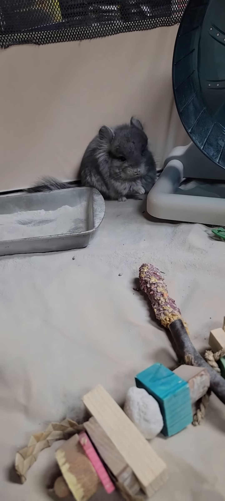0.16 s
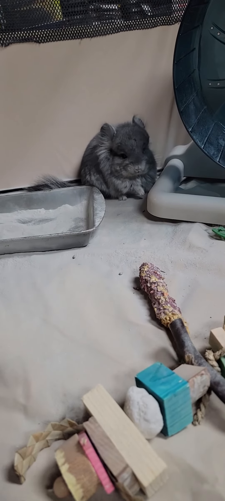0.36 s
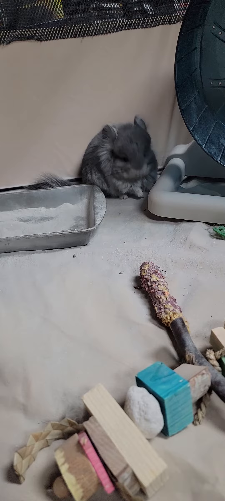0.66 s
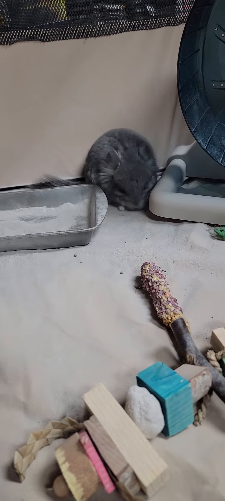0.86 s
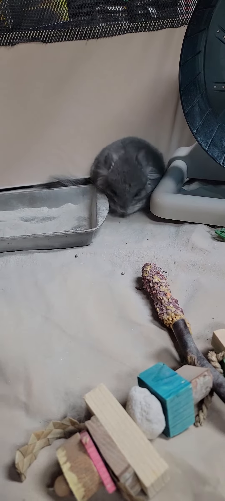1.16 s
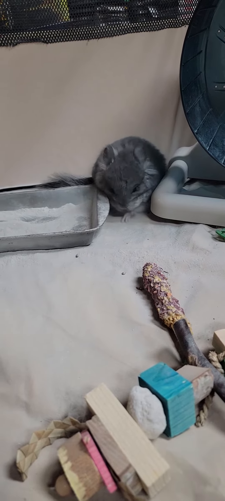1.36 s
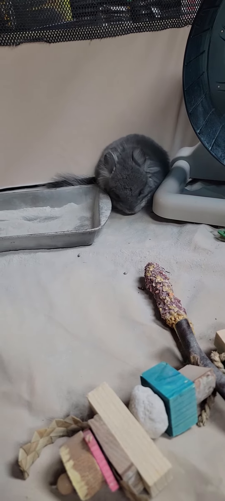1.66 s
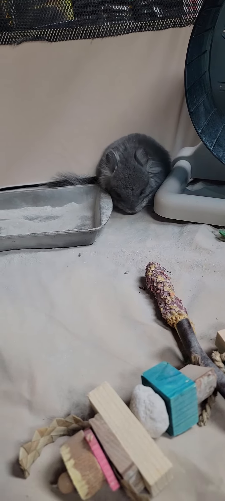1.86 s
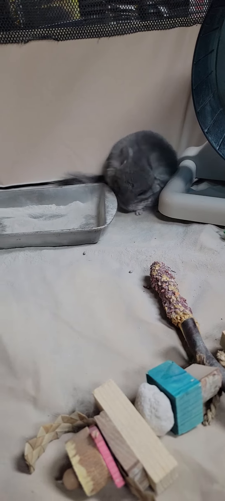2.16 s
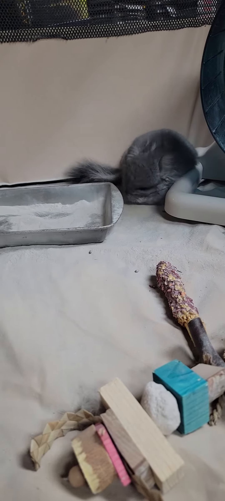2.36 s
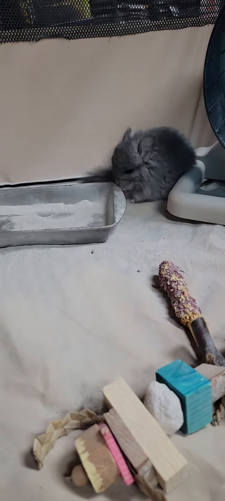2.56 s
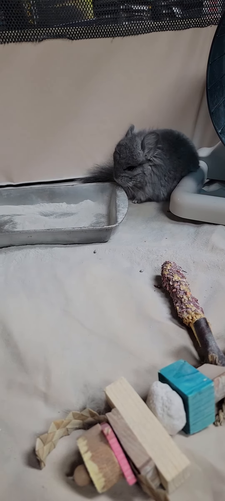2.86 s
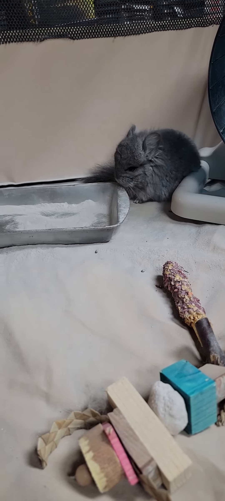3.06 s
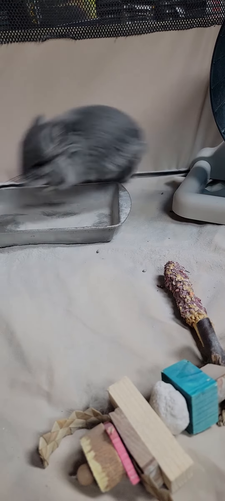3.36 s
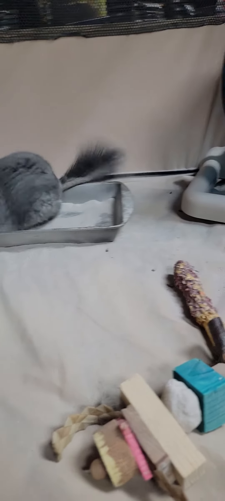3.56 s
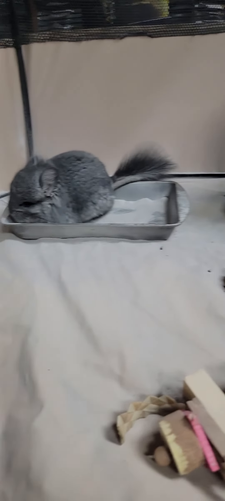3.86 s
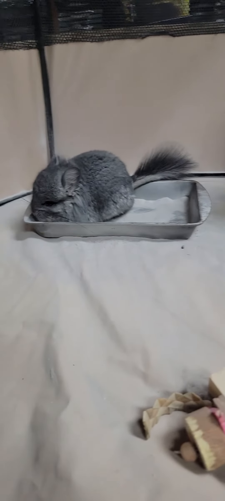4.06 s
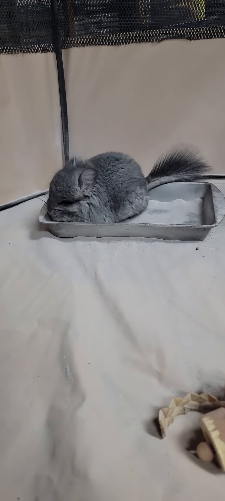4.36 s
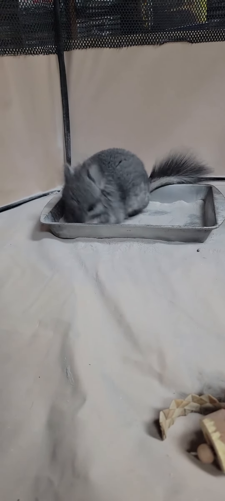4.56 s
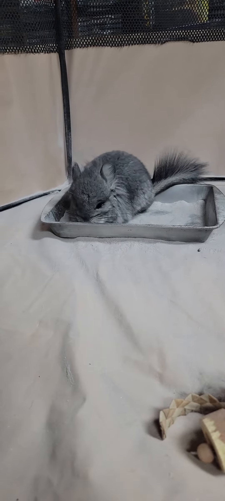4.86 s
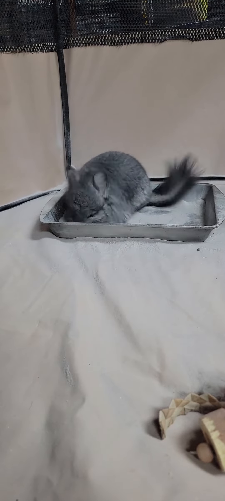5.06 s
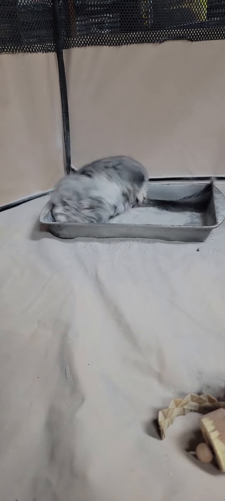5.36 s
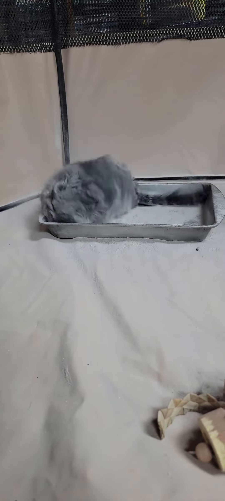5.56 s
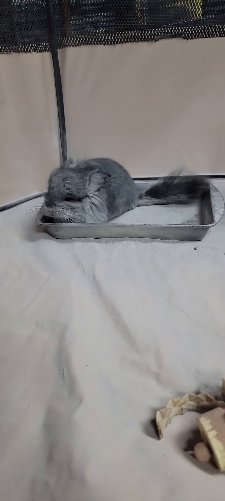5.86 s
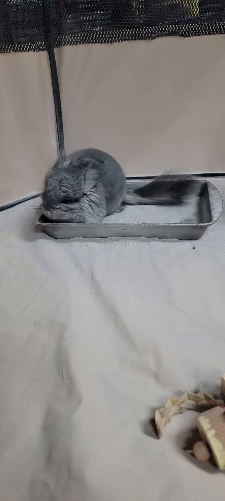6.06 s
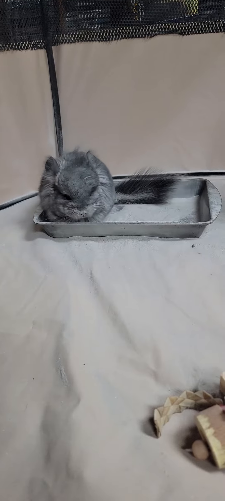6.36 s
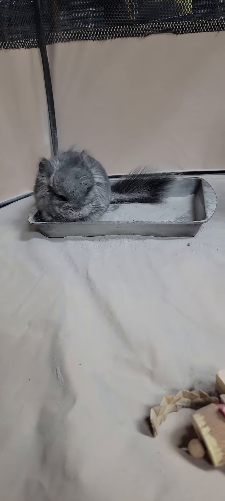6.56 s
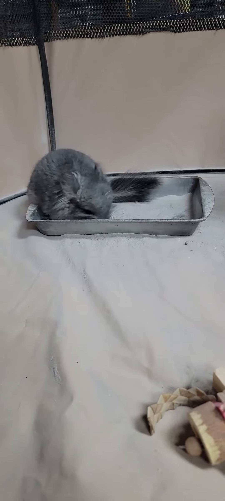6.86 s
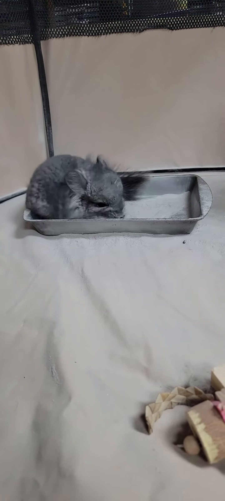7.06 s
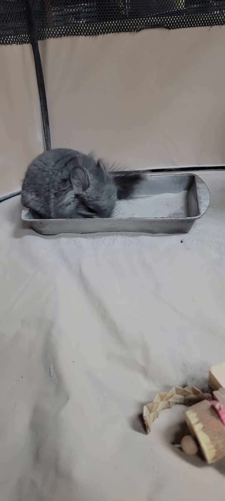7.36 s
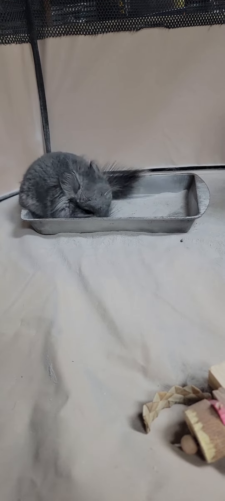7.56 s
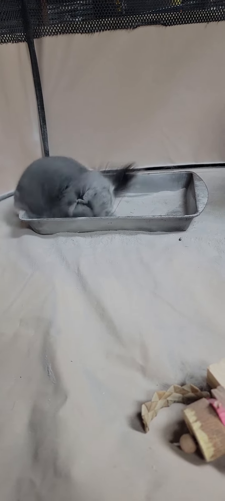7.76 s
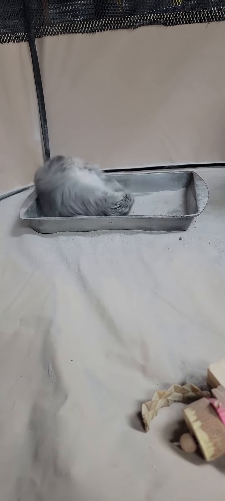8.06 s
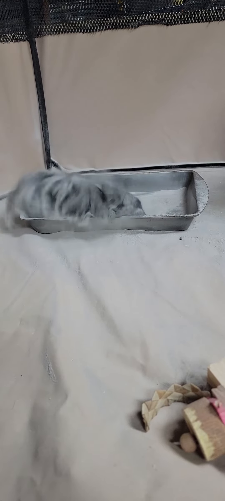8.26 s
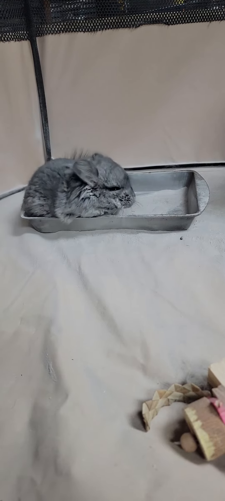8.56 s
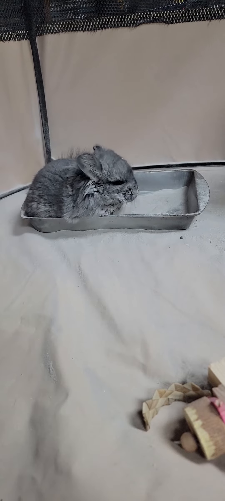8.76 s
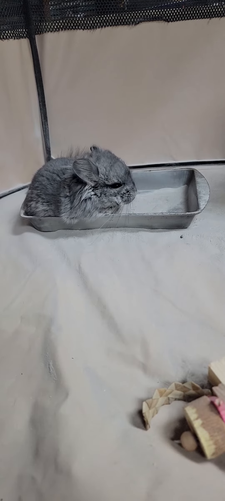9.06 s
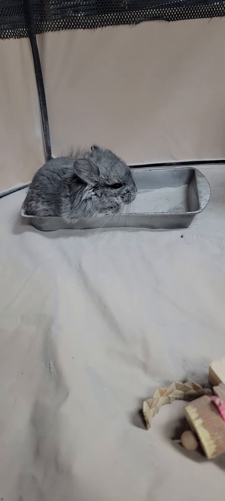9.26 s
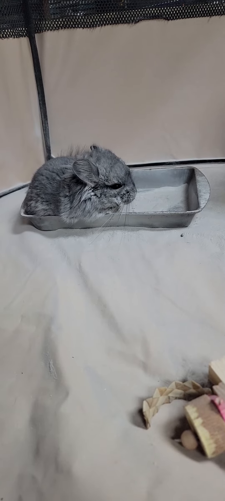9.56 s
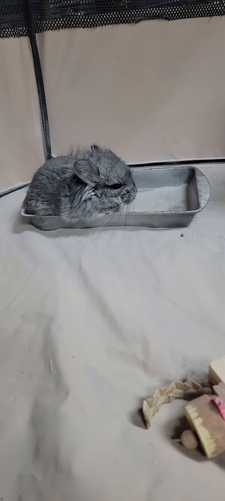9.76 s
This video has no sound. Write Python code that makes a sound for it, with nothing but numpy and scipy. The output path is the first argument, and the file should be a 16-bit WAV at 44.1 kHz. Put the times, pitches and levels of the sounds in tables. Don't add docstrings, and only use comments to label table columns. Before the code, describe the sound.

Close stereo phone pickup in a quiet room with faint low rumble. A chinchilla scratches cloth and plastic in two fast, squeaky bouts with soft floor thuds. It hops into a tin tray with a clank and dusty skid, pauses, then digs and rolls: short damped metallic knocks and hissing grains. A last hard bump is followed by near quiet, tiny grunts and one light ringing tap.

```python
import sys
import numpy as np
from scipy import signal
from scipy.fft import rfft, irfft
from scipy.io import wavfile
from scipy.ndimage import uniform_filter1d

SR = 44100
rng = np.random.default_rng(int(sys.argv[2]) if len(sys.argv) > 2 else 0)


def elevation(decibels):
    levels = np.asarray(decibels, float)
    return 10 ** (levels / 20)


def generate_wav(signal):
    frames = np.transpose(np.atleast_2d(signal))
    scaled = np.clip(frames, -1, 1) * 32767
    pcm = np.round(scaled).astype(np.int16)
    wavfile.write(sys.argv[1], SR, pcm)


N = 437472
HZ = np.fft.rfftfreq(N, 1 / SR)

# (frequency [Hz], level [dB per Hz])
ROOM_SPECTRUM = [(20, -3.5), (30, -2), (40, -3.5), (65, 2.5), (125, -8.5), (150, -16.5), (330, -23),
                 (390, -38), (520, -33.5), (850, -37), (1500, -29.5), (2200, -39.5), (6900, -49.5),
                 (8400, -60.5), (11500, -58.5), (12400, -53.5), (15500, -49)]
# (start [s], swell [s], hold [s], level [dB],
# drift [dB])
CLOTH_MOVES = [
    (0, 0.0085, 7.4, -83.5, -5),
    (0, 0.037, 0.19, -77, -3),
    (.33, 0.066, 0.035, -76.5, 0),
    (.78, 0.13, 0.193, -70, -11),
    (2.235, 0.034, 0.013, -53.5, -5),
    (2.3, .03, .2, -66, 1),
    (2.7, 0.041, 0.29, -73.5, -16),
    (2.6, 0.024, 0.011, -58, -3),
    (3.13, 0.064, 0.091, -66.5, -9),
    (4.09, 0.068, 0.11, -60, -3),
]
# (time [s], peak level [dB], centre [Hz])
DUST_TICKS = [(0.038, -70.5, 3300), (0.189, -71.5, 6300), (0.301, -80, 5500), (.34, -69.5, 5000),
              (0.384, -78, 6400), (1.984, -72.5, 4700), (2.576, -63, 5500), (2.682, -64, 5240),
              (2.727, -63, 5100), (2.808, -99, 5610), (4.515, -73.5, 6000), (4.673, -70.5, 5000),
              (9.067, -74, 6200)]
# (peak time [s], level [dB], floor pitch [Hz], heel level [dB])
FOOTFALLS = [(.254, -47, 32.5, -58), (0.756, -29, 47.9, -31.5), (0.887, -44, 38.1, -51.5),
             (1.32, -30.5, 50, -45), (1.495, -50, 37.1, -50.5), (1.86, -44, 42.7, -69),
             (1.92, -37, 41.65, -47), (2.03, -45.5, 39, -50), (2.498, -27, 50.55, -42),
             (2.628, -43, 53.3, -43), (3.023, -47.5, 57.6, -62), (3.115, -44, 52.4, -53),
             (3.608, -42.5, 40.7, -52.5), (6.549, -50.5, 50.5, -63.5), (7.055, -41.5, 38, -55),
             (7.13, -53, 36.7, -70), (7.631, -43, 36, -65.5)]
# (frequency [Hz], level [dB], t60 [s])
TRAY_MODES = [(209, 2, 0.14), (327, 0.5, 0.15), (525, 1, 0.055), (714.5, -6.5, 0.067), (788, -0.5, 0.043),
              (948, -3.5, 0.06), (1210, -6.5, 0.1), (1373, -1, 0.026), (1798, -4, 0.061),
              (2290, -4.5, 0.029), (2594, -10, 0.16), (3036, -8.5, 0.1), (3480, -6.5, 0.031)]
# (time [s], low ring [dB], high ring [dB], centre of high ring [Hz], centre of low ring [Hz])
FIRST_KNOCKS = [(0.411, -51, -67.5, 1140, 700), (3.345, -74, -42, 2590, 900),
                (3.456, -27, -43.5, 1140, 910), (3.478, -31, -59, 1730, 616), (3.52, -60, -42, 2650, 800),
                (4.613, -51.5, -56.5, 1670, 800), (4.998, -58, -59, 2280, 800),
                (5.237, -60, -62, 1710, 800), (5.565, -35, -52.5, 1780, 800),
                (5.604, -35.5, -60, 1120, 637), (5.704, -64, -47, 1390, 800),
                (5.706, -62, -49.5, 3020, 800), (5.722, -38.5, -54, 1480, 780),
                (5.769, -28, -44.5, 1200, 736), (5.972, -32, -52.5, 1260, 705),
                (6.145, -44.5, -57, 1460, 795), (6.612, -52.5, -70, 1160, 780),
                (6.783, -50, -64, 1144, 804)]
# (time [s], low ring [dB], high ring [dB], centre of high ring [Hz], centre of low ring [Hz])
LATER_KNOCKS = [(7.035, -37.5, -57, 1800, 540), (7.063, -41, -48, 1290, 775), (7.063, -62, -46, 3000, 780),
                (7.116, -45, -60, 1120, 790), (7.154, -37.5, -43.5, 1800, 790),
                (7.155, -64, -52, 3400, 790), (7.202, -30, -55.5, 1400, 790),
                (7.243, -39.5, -58, 1400, 785), (7.275, -38, -58, 1570, 785),
                (7.296, -35, -53.5, 1140, 780), (7.351, -26.5, -48, 1840, 774),
                (7.426, -41, -53.5, 1660, 775), (7.448, -40, -64, 1070, 766),
                (7.533, -54.5, -68.5, 1532, 785), (7.651, -40, -59, 2290, 790),
                (7.674, -35, -56.5, 1243, 800), (7.738, -45.5, -57.5, 2700, 785),
                (8.221, -49, -63, 1210, 520), (8.282, -47, -61, 1790, 850), (8.41, -43, -38.5, 1400, 570),
                (8.447, -24.5, -37, 1310, 804), (8.463, -29.5, -49.5, 1110, 830)]
# (time [s], low ring [dB], high ring [dB], centre of high ring [Hz], centre of low ring [Hz])
PAW_PATS = [(5.005, -50.5, -67, 2300, 540), (5.044, -62, -59.5, 2300, 785), (5.08, -54, -67, 1800, 785),
            (5.1, -51, -60, 1200, 930), (5.125, -56, -56, 1800, 700), (5.146, -53, -55.5, 1300, 930),
            (5.19, -57, -64, 1300, 785), (5.38, -52, -78, 1300, 785), (5.485, -58, -61, 2540, 560),
            (7.711, -54, -61, 2300, 785), (7.945, -70, -77, 1800, 760), (8.3, -52, -57, 1800, 860)]
# (level after a -40 dB ring [dB], growth [dB per dB])
BOOM_LAW = (-62, 0.54)
PUFF_LAW = (-44, 1)
RUB_LAW = (-69, .7)
# (time [s], boom level [dB], pitch [Hz], t60 [s])
LANDINGS = [(.412, -62.5, 323, 0.15), (3.459, -54, 275, 0.046), (3.476, -47, 310, 0.048),
            (4.169, -55, 296, 0.044), (4.613, -56, 256, 0.076), (5.566, -47, 210, 0.039),
            (5.606, -61, 330, 0.066), (5.722, -49.5, 304, 0.037), (5.775, -56, 232, 0.041),
            (5.8, -67.5, 333, 0.32), (5.977, -49, 332, 0.093), (6.011, -55, 312, .06),
            (7.035, -56, 298, 0.049), (7.067, -49, 280, 0.048), (7.08, -56.5, 331, 0.16),
            (7.297, -44.5, 305, 0.024), (7.354, -50, 314, 0.036), (7.43, -54.5, 207, 0.066),
            (8.224, -68, 180, 0.047), (8.281, -64.5, 317, 0.21), (8.416, -54, 284, 0.079),
            (8.45, -39, 272, 0.028), (8.47, -63.5, 332, 0.18)]
# (start [s], swell [s], hold [s], level [dB], drift [dB])
TIN_SLIDES = [
    (5.66, .02, 0.11, -68, 6),
    (4.99, .02, 0.16, -76.5, 10),
    (6.99, 0.024, 0.092, -58.5, -2),
    (7.12, 0.017, 0.1, -55, -9),
    (7.68, 0.016, 0.11, -58, -6.5),
    (9.84, 0.026, .05, -67, 1.5),
]
# (start
# [s], swell [s], hold [s], level [dB], drift [dB])
DUST_MOVES = [(.715, 0.017, 0.0076, -62, 0.5), (3.15, 0.032, 0.12, -77, 5.5),
              (4.54, 0.025, 0.06, -69.5, 11.5), (4.985, 0.027, 0.047, -58, -0.5),
              (5.06, 0.019, 0.073, -54, 0), (5.215, 0.025, 0.012, -59, -4), (5.24, 0.026, .09, -66, 2.5),
              (5.32, .03, 0.018, -63, -5), (5.36, 0.023, 0.085, -70.5, -.6), (5.44, 0.036, 0.13, -62, -2),
              (5.6, 0.023, .04, -70, -2.5), (5.655, 0.026, 0.096, -54, -11.5),
              (5.78, .021, .06, -73.5, -10), (5.96, 0.028, 0.34, -73, -6),
              (6.58, 0.028, .03, -79, -.6), (6.67, 0.016, 0.12, -75, 0.5), (6.82, 0.025, 0.064, -75, -6),
              (6.92, 0.025, 0.054, -67, -4), (6.985, 0.047, 0.35, -58.5, -4.5),
              (7.25, 0.015, 0.021, -65, -.6), (7.41, .021, 0.057, -73.5, -5), (7.5, .03, 0.078, -81, -3),
              (7.58, .03, .04, -69.5, -4), (7.63, 0.026, 0.056, -66.5, -1.5),
              (7.68, 0.024, 0.019, -58, -1.5), (7.73, 0.032, 0.028, -62, 0.5),
              (7.79, .021, 0.12, -71, -2.5), (7.91, 0.034, 0.12, -69, -3.5), (8.02, 0.057, .05, -65.5, 1),
              (8.13, 0.024, 0.088, -74.5, 3.5), (8.239, 0.038, 0.0072, -56.5, 5),
              (8.3, .021, 0.1, -76, 7.5), (8.395, .011, .04, -70, -3), (8.51, 0.017, 0.16, -76, -7),
              (9.74, 0.1, 0.1, -76, -4)]
# (frequency [Hz], level [dB per Hz])
DUST_COLOUR = [(300, -45), (530, -7), (900, -4.5), (1500, -2.5), (2100, -3.5), (2900, -4), (3800, -8.5),
               (4600, -6), (8000, -10), (10300, -14), (13500, -3.5), (16000, -3)]
# (time [s], peak level [dB], squeak
# [Hz])
CLAW_STROKES = [(0.7275, -61, 1900), (0.742, -41, 2040), (0.858, -41.5, 2260), (0.896, -36.5, 2090),
                (0.947, -35.5, 2900), (0.9883, -43, 2130), (1.027, -23.5, 2040), (1.043, -30.5, 3200),
                (1.073, -30, 2180), (1.104, -53, 2260), (1.127, -20.5, 3740), (1.1686, -30.5, 2200),
                (1.21, -19.5, 3230), (1.228, -25.5, 2900), (1.2694, -38, 1690), (1.288, -30.5, 3000),
                (1.302, -17.5, 2286), (1.3306, -24.5, 2300), (1.361, -21, 2300), (1.377, -21, 3030),
                (1.389, -22.5, 3180), (1.4088, -25, 3400), (1.453, -20, 2914), (1.474, -34.5, 2000),
                (1.489, -28, 2900), (1.5, -45.5, 3700), (1.525, -52.5, 2900),
                (2.092, -51, 2490), (2.1341, -36.5, 2240), (2.175, -22, 2860), (2.191, -22, 2380),
                 (2.246, -40, 2200), (2.272, -26, 2300), (2.292, -24, 2400), (2.313, -33.5, 1830),
                 (2.369, -28.5, 2430), (2.418, -36.5, 1870), (2.472, -35, 1920), (2.532, -45.5, 1930),
                 (2.574, -47, 2380), (2.621, -42, 2150)]
# (start [s], swell [s], hold [s], level [dB], drift [dB])
CLAW_DRAGS = [
    (.8, 0.19, 0.073, -50.5, -7),
    (1.095, 0.008, 0.41, -47.5, -1),
    (2.245, 0.032, 0.17, -54, -1.5),
    (2.5, 0.054, 0.28, -66.5, -7.5),
    (3.155, 0.021, 0.24, -69.5, -3.5),
]
# (frequency [Hz], level [dB per Hz])
CLAW_COLOUR = [(88, -53), (150, -20.5), (459, -22), (581, -18.5), (1000, -17.5), (1250, -5), (1490, -14.5),
               (1710, -3), (2210, -1.5), (3700, -6), (4570, -13.5), (7760, -17), (9820, -25), (15100, -11),
               (16400, -50.5)]
# (time [s], peak
# level [dB], pitch [Hz], t60 [s])
SHORT_RINGS = [(1.0314, -36, 2180, .015), (1.1347, -29, 3600, .015), (1.2988, -23, 2400, .004),
               (1.353, -34, 1500, .005), (1.437, -39, 900, .012), (1.4969, -32, 3100, .015),
               (1.5557, -44, 2100, .01), (2.203, -29, 2500, .012), (2.2449, -41, 2200, .012),
               (3.187, -60, 1250, .04), (3.268, -60, 1250, .04), (3.346, -29, 1750, .035),
               (3.3465, -36, 3450, .03), (1.392, -30, 3200, .015), (1.31, -30, 2280, .03),
               (8.612, -67, 1600, .07), (8.785, -66, 750, .13), (9.07, -67, 1500, .05)]
# (time [s], level [dB], start [Hz], end [Hz], length [s])
GLIDES = [(7.76, -68.5, 470, 491, 0.15), (8.222, -60, 1300, 560, 0.05), (8.262, -56, 830, 980, 0.047),
          (8.381, -54, 790, 810, 0.029), (9.401, -62.5, 765, 600, 0.02), (9.462, -62, 585.5, 870, 0.062),
          (9.514, -63, 960, 490, 0.0414), (9.775, -75, 2900, 2950, .04), (1.472, -35, 1750, 4100, .04),
          (9.736, -69, 1340, 1430, 0.0279), (7.77, -66, 1100, 910, .06), (9.854, -60.5, 1100, 580, 0.024),
          (9.785, -67, 887, 930, 0.21), (9.865, -65.5, 630, 814, 0.031)]
# (start [s], swell [s], hold [s], level [dB], drift [dB])
SKID_MOVES = [(3.442, 0.021, 0.065, -44.5, 4.5)]
# (frequency [Hz], level [dB per Hz])
SKID_SPECTRUM = [(210, -45), (350, -13.5), (779, -1.5), (885, -2.5), (1300, -3.5), (1520, -5.5),
                 (2630, -4.5), (8570, -16), (16000, -14.5)]
# (start [s], swell [s], hold [s], level [dB], drift [dB])
TAIL_MOVES = [(4.09, 0.1, 0.066, -58, -1.1)]
# (frequency [Hz], level [dB per Hz])
TAIL_SPECTRUM = [(530, -51), (900, -31), (1310, -0.5), (1850, -14), (3470, -5), (6720, -9.5), (9200, -27),
                 (12600, -14.5), (16000, -6)]
# (time [s], level [dB], clatter [dB])
PEN_TAP = (9.553, -49, -55.5)
# (frequency [Hz], level [dB], t60 [s])
PEN_TAP_MODES = [(488, 2.5, 0.12), (860, -3, 0.14), (1305, -1, 0.1), (1570, 1, 0.11), (2040, -4, 0.11),
                 (2880, -0.5, 0.11), (3300, -7, 0.07), (4040, -4, 0.09), (4250, -6, 0.089),
                 (5000, -23, .08)]
# (frequency [Hz], likeness [0-1])
PORT_LIKENESS = [(60, .97), (150, .97), (350, .8), (700, .94), (1400, .62), (3000, .84), (6000, .36),
                 (14000, .28)]
# (frequency [Hz], phase [rad])
PORT_LEAD = [(20, .1), (125, .35), (350, 1.3), (700, 2.2), (950, 2.6), (1380, 1.7), (1700, .95), (2580, 1),
             (3900, 2.75), (4400, 2.3), (6100, 3.5), (8600, 3.9), (10000, 3.2), (12000, 5.5), (15000, 7.2)]
# (frequency [Hz], left minus right [dB])
PORT_TILT = [(40, -2.1), (125, -3.3), (300, -6), (750, -3.5), (1400, 1.2), (2800, -2), (5600, -.5),
             (9500, 3.5), (14000, -.8)]


def evened(x):
    return x / np.sqrt(np.mean(x ** 2) + 1e-20)


def read(points, hz):
    f, value = np.transpose(points)
    return np.interp(np.log(hz + 1), np.log(f + 1), value)


def add(mix, s, sound):
    part = mix[round(s * SR):][:len(sound)]
    part += sound[:len(part)]


def smoothed(x, size):
    return uniform_filter1d(uniform_filter1d(x, size), size)


def coloured(x, spectrum, lo_hz, hi_hz):
    z = rfft(x) * elevation(read(spectrum, HZ))
    in_band = z[(HZ > lo_hz) & (HZ < hi_hz)]
    return irfft(z, N) / np.sqrt(2 * np.sum(abs(in_band) ** 2)) * N


def grit(per_s, spread_db, smooth):
    happens = rng.random(N) < per_s / SR
    size = elevation(spread_db * np.minimum(rng.exponential(1, N), 4)) * happens
    return smooth * rng.standard_normal(N) + evened(size * rng.standard_normal(N))


def flutter(per_s, depth_db):
    return elevation(depth_db * evened(smoothed(rng.standard_normal(N), int(SR / per_s))))


def spurts(per_s, depth, t60):
    kicks = rng.exponential(1, N) * (rng.random(N) < per_s / SR)
    return 1 + depth * signal.lfilter([1], [1, -elevation(-60 / t60 / SR)], kicks)


def moves(rows):
    out = np.zeros(N)
    for s, swell, hold, db, drift_db in rows:
        t = np.arange(0, swell + hold + 0.18, 1 / SR) - swell
        shape_db = 28 * np.minimum(t / swell, 0)
        shape_db += drift_db * np.clip(t / hold, 0, 1)
        shape_db -= 476 * np.maximum(t - hold, 0)
        soft_start = np.minimum((t + swell) / 0.0038, 1)
        add(out, s, elevation(db + shape_db) * soft_start)
    return out


def ring(modes, rise, spread, count=3):
    t = np.arange(SR // 6)[:, None] / SR
    hz, db, t60 = np.repeat(modes, count, 0).T
    hz = hz * (1 + spread * rng.standard_normal(len(hz)))
    waves = np.sin(2 * np.pi * (hz * t + rng.random(len(hz))))
    body = (elevation(db - 60 * t / t60) * waves).sum(1)
    return body * (1 - np.exp(-t[:, 0] / rise)) / np.sqrt(np.sum(elevation(db) ** 2) / 2)


def follows(law, ring_db):
    return law[0] + law[1] * (ring_db + 40)


def room():
    rumble = coloured(rng.standard_normal(N), ROOM_SPECTRUM, 21, 16000) * flutter(42.0, 0.18)
    drone = np.sin(2 * np.pi * 49.0 * np.arange(N) / SR)
    return elevation(-57.5) * rumble + elevation(-74.5) * drone


def cloth():
    band = signal.butter(5, [220, 700], "band", fs=SR, output="sos")
    rustle = evened(signal.sosfilt(band, grit(900, 3.2, 0.9)))
    return rustle * moves(CLOTH_MOVES) * flutter(40, 2.2)


def dust_ticks():
    out, t = np.zeros(N), np.arange(SR // 8) / SR
    for s, db, hz in DUST_TICKS:
        puff = evened(signal.lfilter(*signal.iirpeak(hz, 1.8, SR), rng.standard_normal(len(t))))
        add(out, s, elevation(db - 60 * t / 0.13) * (1 - np.exp(-t / 0.00086)) * puff)
    return out


def steps():
    out, t = np.zeros(N), np.arange(-.15, .3, 1 / SR)
    rise_db_per_s, fall_db_per_s = 371, 198
    swell = elevation(rise_db_per_s * np.minimum(t, 0) - fall_db_per_s * np.maximum(t, 0))
    slack = 1 - 0.102 * np.tanh(t / 0.063)
    for s, db, hz, heel_db in FOOTFALLS:
        swing = 2 * np.pi * hz * np.cumsum(slack) / SR
        boards = elevation(db) * np.sin(swing)
        heel = elevation(heel_db - 245 * abs(t)) * np.sin(1.85 * swing)
        add(out, s + t[0], np.sqrt(2) * swell * (boards + heel))
    return out


def clatter_noise():
    band = signal.butter(2, [600, 5000], "band", fs=SR, output="sos")
    return evened(signal.sosfilt(band, grit(2600, 4.5, 0.34)))


def knocks():
    out, puff, clatter = np.zeros((3, N))
    t = np.arange(SR // 8) / SR
    ring_t = np.arange(SR // 6) / SR
    rings_on, stilled_s = .22, .0115
    stilled = rings_on + (1 - rings_on) * np.exp(-(ring_t / stilled_s) ** 3)
    high_ring_share = .45
    hz, usual_db, t60 = np.transpose(TRAY_MODES)
    for s, low_db, high_db, centre_hz, low_hz in FIRST_KNOCKS + LATER_KNOCKS + PAW_PATS:
        boom_db = follows(BOOM_LAW, max(low_db, high_db))
        puff_db = follows(PUFF_LAW, high_db)
        db = usual_db + 1.05 * rng.standard_normal(len(hz))
        db[2:6] -= 27.0 * abs(np.log2(hz[2:6] / low_hz))
        db[6:] -= 10.0 * abs(np.log2(hz[6:] / centre_hz))
        modes = np.transpose([hz, db, t60])
        low_ring = ring(modes[2:6] * [1, 1, 2], 0.0025, 0.011, count=1)
        high_ring = ring(modes[6:] * [1, 1, high_ring_share], 0.00044, 0.0513, count=4)
        add(out, s, elevation(boom_db) * ring(modes[:2], 0.00057, 0.04))
        add(out, s, elevation(low_db - 6.5) * stilled * low_ring)
        add(out, s, elevation(high_db + 9.5) * high_ring)
        rattle = elevation(high_db - 9.5 - 60 * t / 0.094)
        tick = elevation(high_db - 11.0 - 60 * t / 0.0042)
        add(clatter, s, rattle + tick)
        add(puff, s, elevation(puff_db - 7.5 - 60 * t / 0.02))
    jumping_dust = coloured(grit(4900, 1.0, 0.16), DUST_COLOUR, 4000, 12000)
    return out + clatter * clatter_noise() + puff * jumping_dust


def tin_rub():
    after_knocks, t = np.zeros(N), np.arange(SR // 4) / SR
    for s, low_db, *_ in FIRST_KNOCKS + LATER_KNOCKS:
        add(after_knocks, s, elevation(follows(RUB_LAW, low_db) - 60 * t / 0.21))
    grains = grit(900, 2.4, 0.87) * (after_knocks + moves(TIN_SLIDES))
    tin = ring(TRAY_MODES[4:5], 0.00026, 0.008, count=2)
    return elevation(-25.5) * signal.oaconvolve(grains, tin)[:N]


def landings():
    out = np.zeros(N)
    for s, db, hz, t60 in LANDINGS:
        add(out, s, elevation(db + 4.0) * ring([(hz, 0, t60)], 0.00087, 0.043, count=2))
    return out


def dust():
    hiss = coloured(grit(9000, 2.8, 1.0), DUST_COLOUR, 2700, 16300)
    return hiss * moves(DUST_MOVES) * spurts(29, 0.18, 0.096) * flutter(65, 1.2)


def claws():
    scrape = coloured(grit(7000, 2.16, 0.53), CLAW_COLOUR, 980, 6700)
    out = moves(CLAW_DRAGS) * flutter(76.15, 1.3) * scrape
    t, swell_s = np.arange(SR // 6) / SR, .0125
    away = t / swell_s - 3
    fade_db = np.where(away < 0, 11, 13)
    swell = elevation(-fade_db * abs(away) ** 1.11)
    for s, db, hz in CLAW_STROKES:
        piece = scrape[round(s * SR):][:len(t)]
        squeak = evened(signal.lfilter(*signal.iirpeak(hz, 6.0, SR), piece))
        add(out, s - 2.3 * swell_s, elevation(db - 17.0) * swell * (piece + .5 * squeak))
    return out


def short_rings():
    out, t = np.zeros(N), np.arange(SR // 8) / SR
    for s, db, hz, t60 in SHORT_RINGS:
        add(out, s, elevation(db - 60 * t / t60) * np.sin(2 * np.pi * hz * t))
    return out


def grunts():
    out = np.zeros(N)
    for s, db, from_hz, to_hz, length in GLIDES:
        hz = np.geomspace(from_hz, to_hz, round(length * SR))
        rough = 1 + 0.33 * evened(uniform_filter1d(rng.standard_normal(len(hz)), size=150))
        tone = np.sin(2 * np.pi * np.cumsum(hz) / SR)
        add(out, s, elevation(db) * np.hanning(len(hz)) * rough * tone)
    return out


def skid():
    hiss = coloured(grit(6000, 2.0, 0.89), SKID_SPECTRUM, 400, 15000)
    return hiss * moves(SKID_MOVES) * flutter(65, 2.4)


def tail_sweep():
    hiss = coloured(grit(9000, 1.5, 2.1), TAIL_SPECTRUM, 900, 13800)
    return hiss * moves(TAIL_MOVES) * flutter(40, 1.5)


def pen_tap():
    out, clatter = np.zeros((2, N))
    t = np.arange(SR // 8) / SR
    s, db, clatter_db = PEN_TAP
    tap = elevation(db) * ring(PEN_TAP_MODES, 0.0017, 0.0336, count=4)
    add(out, s, tap)
    add(out, s + .021, elevation(-3) * tap)
    add(clatter, s, elevation(clatter_db - 60 * t / 0.16))
    return out + clatter * clatter_noise()


def ports(x, wall_t60):
    same = np.clip(read(PORT_LIKENESS, HZ), 0, 1)
    turn = read(PORT_LEAD, HZ)
    z = rfft(x) / np.sqrt((1 + same * np.cos(turn)) / 2)
    t = np.arange(SR // 8) / SR
    walls = rng.standard_normal((6, 2, len(t))) * elevation(-60 * t / wall_t60)
    shares = smoothed(rng.standard_normal((6, N)), 1200)
    shares = shares / np.linalg.norm(shares, axis=0)
    stray = irfft(np.sqrt(1 - same) * z, N)
    echoes = 0
    for share, wall in zip(shares, walls):
        echoes = echoes + rfft(stray * share) * rfft(wall / np.linalg.norm(wall[0]), N)
    side = np.array([[.5], [-.5]])
    direct = np.sqrt(same) * np.exp(1j * side * turn) * z
    return irfft((direct + echoes) * elevation(side * read(PORT_TILT, HZ)), N)


def scene():
    tray = knocks() + tin_rub() + landings() + dust() + skid() + tail_sweep()
    corner = cloth() + dust_ticks() + claws() + short_rings() + grunts() + pen_tap()
    near = ports(tray + corner, 0.033)
    return near + ports(room(), 1.0) + steps() * elevation([[-1.1], [.9]])


def top_cut(x):
    return signal.sosfilt(signal.butter(12, 16510, fs=SR, output="sos"), x)


def record(dry):
    edge = signal.firwin(301, 15660, window=("kaiser", 8), fs=SR)
    mix = signal.oaconvolve(dry, edge[None], "same")
    return top_cut(mix)


dry = scene()
out = record(dry)
generate_wav(out)
```